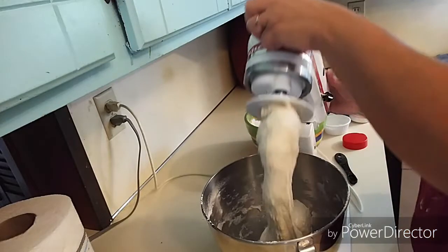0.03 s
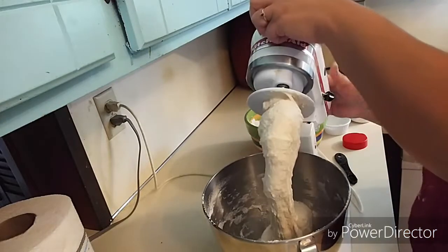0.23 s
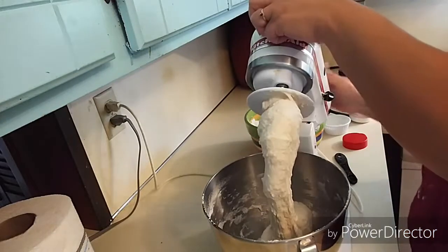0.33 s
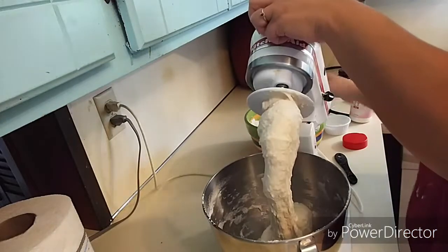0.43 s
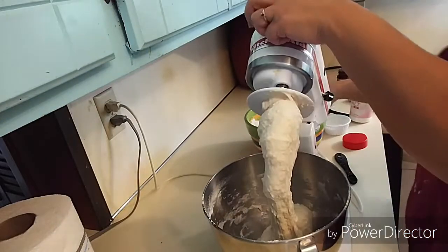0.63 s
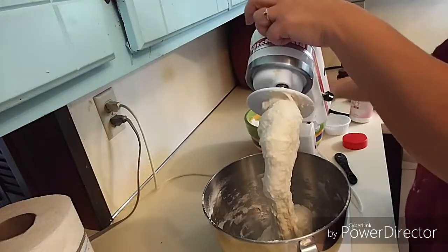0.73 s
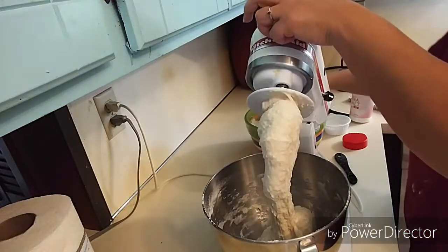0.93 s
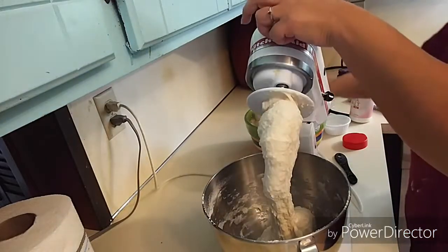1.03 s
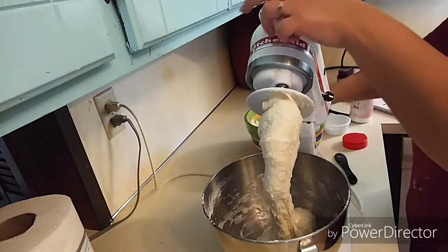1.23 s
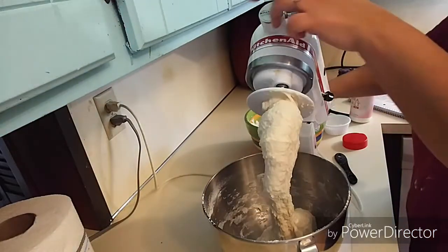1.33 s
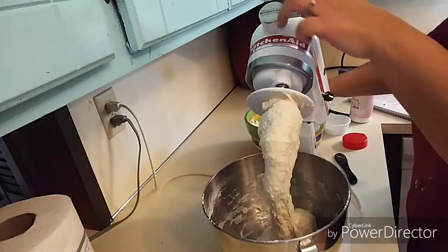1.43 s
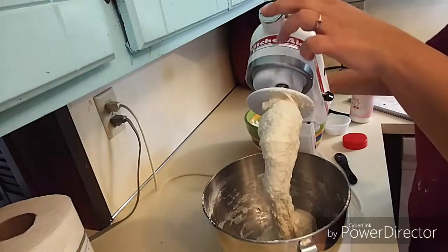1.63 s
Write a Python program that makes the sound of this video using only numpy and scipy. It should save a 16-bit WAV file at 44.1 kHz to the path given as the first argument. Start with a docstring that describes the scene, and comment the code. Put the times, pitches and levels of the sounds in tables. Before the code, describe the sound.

A stand mixer head swings up with a brief rubbing swish and hits its stop at about 0.2 seconds with a sharp, rattling clunk that shakes the counter. Faint rubbing and a tiny squeak follow around 0.8 seconds. The lock snaps with a sharp metal clack at 1.1 seconds, then a small hollow knock comes at 1.4. The small kitchen rings briefly over a low hum and faint hiss.

```python
"""A rubbing swish as the head of a stand mixer swings up. It cracks against its stop and rebounds,
ringing the housing and shaking the counter. The hand slides, the feet settle, something squeaks faintly.
The lock snaps home with a sharp metal clack, and a small hollow knock follows. Each hit is dying sines
for the ring plus dying noise bands for the crack; friction is shaped noise.
A small kitchen rings briefly around the hits, over a low hum and faint hiss."""
import sys
import numpy as np
from scipy import signal
from scipy.io import wavfile

SR = 44100
rng = np.random.default_rng(int(sys.argv[2]) if len(sys.argv) > 2 else 0)


def pcm_store(signal):
    """Save signal as 16-bit PCM."""
    levels = np.round(np.clip(np.atleast_2d(signal), -1, 1) * 32767)
    wavfile.write(sys.argv[1], SR, levels.astype(np.int16).T)


N = 74970
T = np.arange(N) / SR

# swish of head and hand, envelope: t/s, level/dB
RUB_ENVELOPE = [(0, -45.5), (.04, -39.5), (.1, -40), (.16, -45.5), (.21, -50), (.35, -50), (.5, -59.5),
                (.57, -70), (.63, -56.5), (.7, -66), (.79, -60), (.9, -69.5), (1.3, -61), (1.7, -97)]
# its colour: f/Hz, relative level/dB
RUB_COLOUR = [(60, -23), (150, -19), (300, -11), (520, -8.5), (800, -1.5), (2300, 0.5), (4200, -1.5),
              (7800, 4), (11000, -11.5), (15000, -15)]

# colour of the room tone: f/Hz, relative level/dB
ROOM_TONE_COLOUR = [(25, -33), (40, -6), (56, 2.5), (90, -3), (160, -8.5), (270, 2), (370, 5.5),
                    (520, -2.5), (740, 6.5), (1200, -8), (2200, -10), (6000, -9.5), (15000, -16)]
# low hum of the kitchen: f/Hz, level/dB
HUM_PARTIALS = [(57, -58.5), (120, -64.5)]
# faint hiss, envelope: t/s, level/dB
HISS_ENVELOPE = [(0, -83), (.25, -53), (.36, -52.5), (.44, -46), (.55, -54.5), (.7, -60), (1.0, -58),
                 (1.3, -65.5), (1.42, -60.5), (1.49, -54), (1.57, -60.5), (1.65, -56), (1.7, -55)]
# its colour: f/Hz, relative level/dB
HISS_COLOUR = [(300, -6), (2000, -5.5), (4500, -1), (7900, 8.5), (10500, 0.5), (15000, -3)]

# the head hits its stop: t/s, housing ring/dB, counter thump/dB, crack/dB, rattle/dB
HEAD_HITS = [(0.1893, -21, -26, -46, -18), (0.2179, -15.5, -35, 3.5, 3), (0.221, -1.5, -45, 6, 0.5),
             (0.2251, -52, 3, -7, 3.5), (0.2726, -9, -37, -32, -19), (0.3383, -5, -10.5, -38, -1),
             (1.181, -22, -23, -50, -27)]
# ring of the housing: f/Hz, level/dB, t60/s
HOUSING_MODES = [(357, -27.5, 0.05), (358.3, -13, 0.12), (386, -20, 0.19), (615.5, -26.5, 0.12),
                 (713, -35.5, 0.21), (824, -35, 0.24), (1040, -43, 0.26)]
# thump of the counter: f/Hz, level/dB, t60/s
COUNTER_MODES = [(40.7, -31, 0.38), (75.86, -20, 0.68), (117, -15, 0.16), (134.2, -18, .3), (188, -21, 0.4),
                 (223.7, -26, 0.32)]
# dense upper modes of the stop: f/Hz, octave level/dB, t60/s
STOP_CRACK = [(202, -39, 0.14), (810, -51, 0.18), (1300, -38, 0.075), (1690, -36, 0.057), (2200, -27, 0.11),
              (3120, -35, 0.1), (4600, -45.5, 0.093), (7340, -30.5, 0.11), (10260, -45.5, 0.072),
              (15000, -59, 0.039)]
# dull rattle of the hinge: f/Hz, octave level/dB, t60/s
HINGE_RATTLE = [(200, -54, 0.11), (396, -28, 0.18), (513, -36.5, 0.18), (686, -32.5, 0.2),
                (1140, -37, 0.074), (1680, -60, 0.085), (6000, -68, .08)]
# low shudder of the loose head, envelope: t/s, level/dB
SHUDDER_ENVELOPE = [(.22, -46.5), (.24, -15), (.28, -30.5), (.33, -27), (.38, -32.5), (.41, -36),
                    (.44, -53), (.6, -52), (.7, -90)]
# its colour: f/Hz, relative level/dB
SHUDDER_COLOUR = [(30, -16), (45, 2), (80, -12.5), (160, -3.5), (280, -15), (370, 0), (500, -21),
                  (750, -16), (1500, -26), (6000, -41)]
# the kitchen's reverb tail: f/Hz, level/dB, t60/s
KITCHEN_TAIL = [(58, -19.5, 0.61), (297, -18, 0.46), (690, -7, 0.3), (1560, -9.5, 0.33), (3800, -2, 0.28),
                (7740, -3.5, 0.26), (14900, 2, 0.19)]

# the mixer slides against the hand, envelope: t/s, level/dB
SLIDE_ENVELOPE = [(.4, -70), (.47, -51.5), (.55, -52.5), (.65, -64), (.73, -59), (.8, -53), (.87, -54),
                  (.95, -78)]
# its colour: f/Hz, relative level/dB
SLIDE_COLOUR = [(60, -22), (130, 1.5), (250, -10), (380, -3), (520, -5.5), (760, 7), (1200, -7.5),
                (3000, -25), (10000, -30)]
# the counter takes the mixer's weight again: t/s, level/dB
FOOT_BUMPS = [(0.496, -30), (0.769, -36.5), (1.21, -24.5), (1.235, -21)]
# faint squeak, envelope: t/s, level/dB
SQUEAK_ENVELOPE = [(.7, -92), (.77, -56), (.83, -66), (.9, -90)]

# contacts of the lock: t/s, ring/dB, crack/dB
LOCK_HITS = [(1.1026, 0.5, -40), (1.1052, -21, 9), (1.1101, -16, -7), (1.1188, -32, -8)]
# its metal ring: f/Hz, level/dB, t60/s
LOCK_MODES = [(367, -21.5, 0.13), (511, -28.5, 0.098), (622, -26.5, 0.29), (720, -17.5, 0.1),
              (834, -25.5, 0.064), (939, -25, 0.17), (1040, -20, 0.2), (1071, -20.5, .18),
              (1088, -22.5, 0.23), (1143, -27, 0.25), (1273, -23.5, 0.1), (1791, -13.5, 0.087),
              (1873, -20.5, 0.08), (2830, -32.5, 0.16), (3654, -31.5, 0.08), (4690, -45, 0.11),
              (6270, -35.5, 0.12)]
# its dense modes: f/Hz, octave level/dB, t60/s
LOCK_CRACK = [(110, -54.5, 0.2), (253, -47, 0.3), (370, -40, 0.16), (703, -18, 0.11), (1292, -32, 0.21),
              (1800, -43, 0.097), (2360, -43.5, 0.25), (4300, -38, 0.12), (6470, -39.5, 0.12),
              (8800, -51.5, 0.098), (14100, -61, 0.11)]

# contacts of the knock: t/s, ring/dB, crack/dB
KNOCK_HITS = [(1.4301, -9.5, 4), (1.4359, 0, -6.5), (1.4387, -6.5, -3)]
# its hollow ring: f/Hz, level/dB, t60/s
KNOCK_MODES = [(633, -29, 0.26), (664, -37.5, 0.26), (676, -16.5, 0.032), (713.6, -33.5, 0.14),
               (792, -39, 0.16)]
# its dense modes: f/Hz, octave level/dB, t60/s
KNOCK_CRACK = [(151, -52, 0.14), (405, -48, 0.096), (650, -34, 0.21), (960, -49, .1), (1250, -43, 0.15),
               (2090, -58.5, 0.21), (6400, -54.5, 0.13), (14000, -66, .08)]

# stereo width of the noise bands: f/Hz, side against mid/dB
STEREO_WIDTH = [(60, -18), (150, -16.5), (380, -10.5), (690, -1.5), (1200, 1.5), (15000, -0.5)]


def from_db(db):
    """Decibels to gain."""
    return 10 ** (np.asarray(db) / 20)


def rms_one(x):
    """Scale to unit rms."""
    return x / np.sqrt(np.mean(x ** 2) + 1e-20)


def at_hz(table, hz):
    """The columns of a table at one frequency."""
    freqs, *columns = np.transpose(table)
    return [np.interp(np.log(hz), np.log(freqs), c) for c in columns]


def envelope(points):
    """Gain over time from points of t/s, level/dB."""
    return from_db(np.interp(T, *np.transpose(points)))


def attack(seconds):
    """The build-up of a contact."""
    return 1 - np.exp(-T / seconds)


def decay(t60):
    """Fall by 60 dB in t60 seconds."""
    return np.exp(-np.log(1000) * T / t60)


def noise_bands():
    """Third-octave bands of stereo noise at unit rms, each with its centre frequency."""
    edges = 22 * 2 ** (np.arange(30) / 3)
    white = rng.standard_normal((2, 2, N + SR // 4))
    for k, (low, high) in enumerate(zip(edges, edges[1:])):
        bandpass = signal.butter(2, [low, high], "band", fs=SR, output="sos")
        mid, side = signal.sosfilt(bandpass, white[k % 2])[:, -N:]
        hz = np.sqrt(low * high)
        width = from_db(at_hz(STEREO_WIDTH, hz)[0])
        yield hz, rms_one(mid + width * side * [[1], [-1]])


def noise(colour):
    """Steady coloured noise at unit rms."""
    return rms_one(sum(from_db(at_hz(colour, hz)[0]) * band for hz, band in noise_bands()))


def ring(modes, attack_s, right_lag_s=0):
    """A struck body rings as dying sines; the right ear may hear them later."""
    ear_time = np.maximum(T - [[0], [right_lag_s]], 0)
    partials = sum(from_db(db) * decay(t60) * np.sin(2 * np.pi * hz * ear_time) for hz, db, t60 in modes)
    return attack(attack_s) * partials


def crack(dense_modes, attack_s=0.00031):
    """Modes too dense to tell apart: a noise burst dying band by band."""
    burst = 0
    for hz, band in noise_bands():
        db, t60 = at_hz(dense_modes, hz)
        burst += from_db(db) * decay(t60) * band
    return attack(attack_s) * burst / np.sqrt(3)  # three bands share an octave's power


def trigger(one_shot, times, levels_db):
    """Play a one-shot at each time and level."""
    out = np.zeros((2, N))
    for t, db in zip(times, levels_db):
        start = int(t * SR)
        out[:, start:] += from_db(db) * one_shot[:, :N - start]
    return out


def rubbing_swish():
    """Broad friction of head and hand, loudest on the upswing."""
    return envelope(RUB_ENVELOPE) * noise(RUB_COLOUR)


def room_bed(tone_db=-54.5):
    """Steady room tone and hum under a hiss that swells and dips."""
    hum = sum(from_db(db) * np.sin(2 * np.pi * (hz * T + rng.random())) for hz, db in HUM_PARTIALS)
    tone = from_db(tone_db) * noise(ROOM_TONE_COLOUR)
    hiss = envelope(HISS_ENVELOPE) * noise(HISS_COLOUR)
    return tone + hum + hiss


def head_impact():
    """The head cracks against its stop, rings the housing, thumps the counter, rattles and shudders."""
    times, ring_db, thump_db, crack_db, rattle_db = np.transpose(HEAD_HITS)
    housing = trigger(ring(HOUSING_MODES, attack_s=0.00034), times, ring_db)
    counter = trigger(counter_thump(), times, thump_db)
    stop = trigger(crack(STOP_CRACK), times, crack_db)
    hinge = trigger(crack(HINGE_RATTLE), times, rattle_db)
    shudder = envelope(SHUDDER_ENVELOPE) * noise(SHUDDER_COLOUR)
    return housing + counter + stop + hinge + shudder


def counter_thump():
    """One blow sets the counter's low modes ringing."""
    return ring(COUNTER_MODES, attack_s=0.0019)


def kitchen_reverb(source, predelay_s=0.006):
    """Cupboards and walls throw back a short, diffuse tail."""
    tail = 0
    for hz, band in noise_bands():
        db, t60 = at_hz(KITCHEN_TAIL, hz)
        spectrum_share = hz * (2 ** (1 / 6) - 2 ** (-1 / 6)) / (SR / 2)
        tail += from_db(db) * rms_one(band * decay(t60)) * np.sqrt(spectrum_share / N)
    mono_send = source.mean(axis=0)[None]
    return signal.fftconvolve(mono_send, trigger(tail, [predelay_s], [0]), axes=1)[:, :N]


def hand_slide():
    """Dull friction of the mixer against the hand."""
    return envelope(SLIDE_ENVELOPE) * noise(SLIDE_COLOUR)


def settling_feet(damping_t60_s=0.19, high_cut_hz=260):
    """Soft bumps of the mixer's feet, which press on the counter and damp it further."""
    bumps = trigger(counter_thump() * decay(damping_t60_s), *np.transpose(FOOT_BUMPS))
    return signal.sosfilt(signal.butter(2, high_cut_hz, fs=SR, output="sos"), bumps)


def squeak(pitch_hz=1520, width_hz=110):
    """A faint squeak while the head is held: friction noise sent twice through a narrow resonance."""
    resonance = signal.iirpeak(pitch_hz, pitch_hz / width_hz, fs=SR)
    friction = rng.standard_normal((2, N))
    pitched = signal.lfilter(*resonance, signal.lfilter(*resonance, friction))
    return envelope(SQUEAK_ENVELOPE) * rms_one(pitched)


def clack(hits, modes, dense_modes, right_lag_s, attack_s=0.0012):
    """A part lands in a quick run of contacts, each a ring plus a crack."""
    times, ring_db, crack_db = np.transpose(hits)
    body = trigger(ring(modes, attack_s, right_lag_s), times, ring_db)
    return body + trigger(crack(dense_modes), times, crack_db)


def lock_snap(high_cut_hz=11000):
    """The lock snaps home: a sharp metal clack with its top rolled off."""
    snap = clack(LOCK_HITS, LOCK_MODES, LOCK_CRACK, right_lag_s=0.0002)
    return signal.sosfilt(signal.butter(8, high_cut_hz, fs=SR, output="sos"), snap)


def hollow_knock():
    """Three quick contacts ring a tight cluster of midrange modes."""
    return clack(KNOCK_HITS, KNOCK_MODES, KNOCK_CRACK, right_lag_s=0.00018)


def scene():
    """The hits feed the kitchen's reverb; friction and room bed stay dry."""
    hits = lock_snap() + hollow_knock() + head_impact() + settling_feet()
    reverb = kitchen_reverb(hits)
    friction = squeak() + rubbing_swish() + hand_slide()
    return hits + reverb + friction + room_bed()


def record(dry, low_cut_hz=38, high_cut_hz=15400):
    """The microphone loses the deepest bass, and the top is cut steeply."""
    thinned = signal.sosfilt(signal.butter(6, low_cut_hz, "high", fs=SR, output="sos"), dry)
    return signal.sosfilt(signal.ellip(10, .1, 80, high_cut_hz, fs=SR, output="sos"), thinned)


dry = scene()
out = record(dry)
pcm_store(out)
```